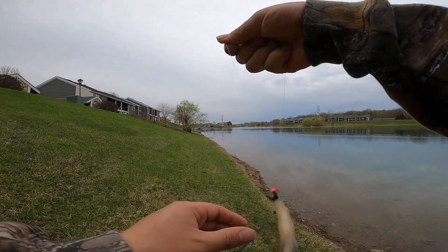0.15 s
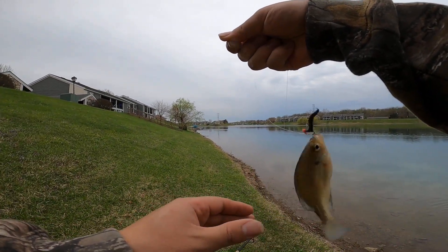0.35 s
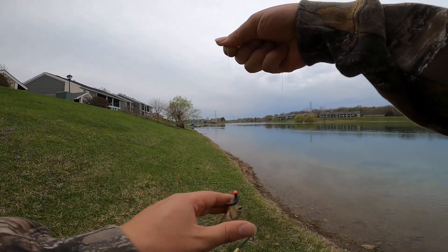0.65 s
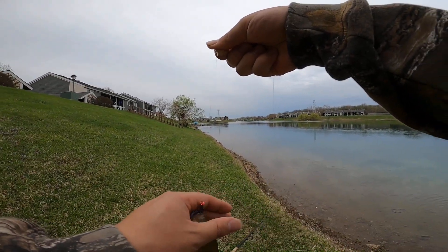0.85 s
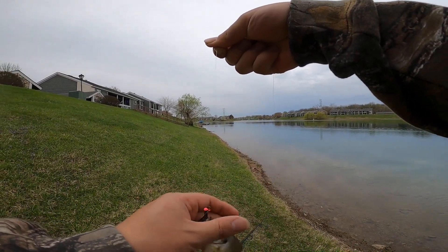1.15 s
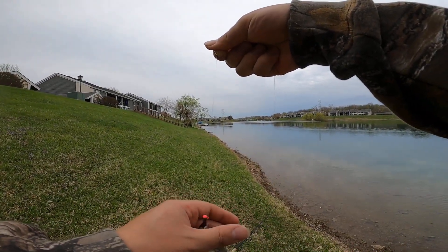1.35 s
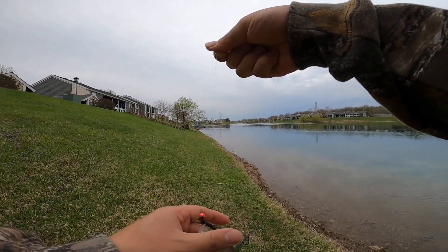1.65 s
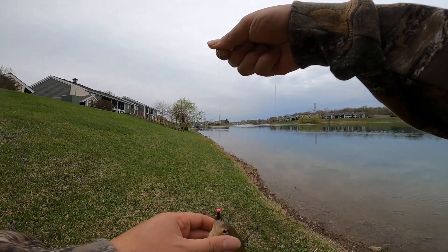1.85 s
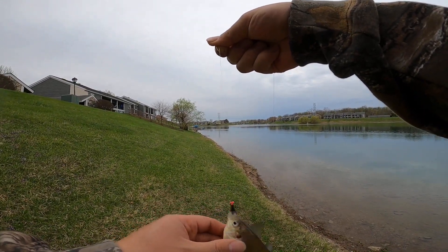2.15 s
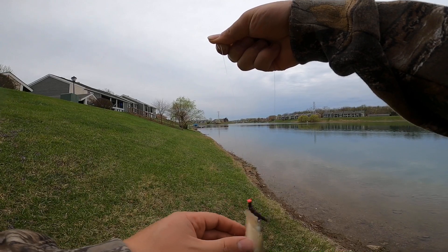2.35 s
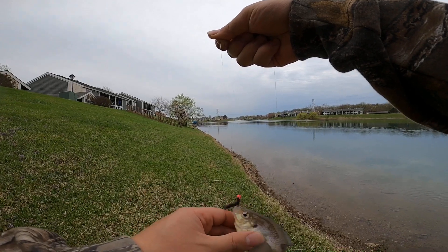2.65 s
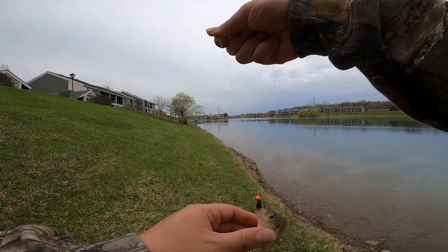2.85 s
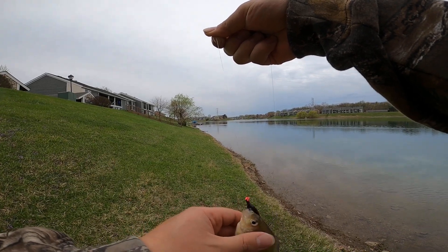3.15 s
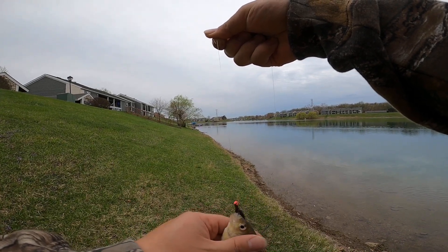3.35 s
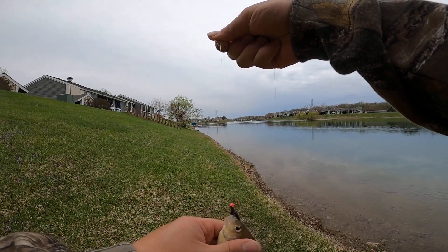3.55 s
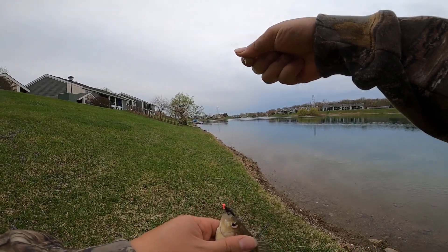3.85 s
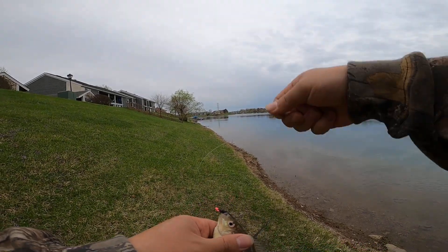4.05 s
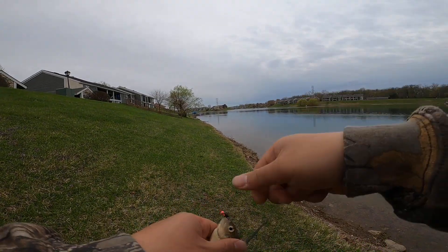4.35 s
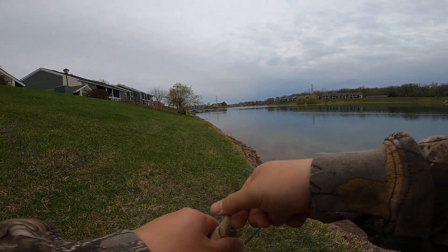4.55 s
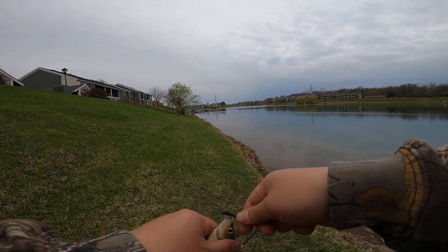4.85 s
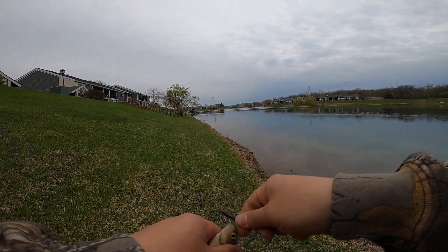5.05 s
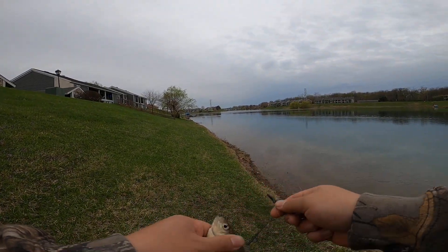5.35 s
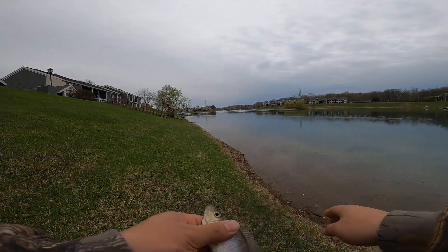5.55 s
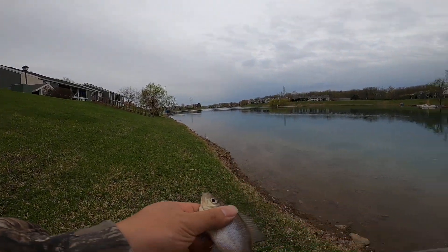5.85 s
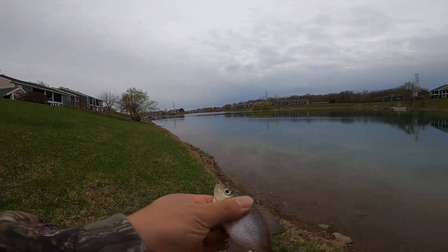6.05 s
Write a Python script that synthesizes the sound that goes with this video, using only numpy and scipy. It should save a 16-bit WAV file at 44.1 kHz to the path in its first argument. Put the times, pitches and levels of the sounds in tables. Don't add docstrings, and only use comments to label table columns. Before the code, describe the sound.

Hoarse sparrow cheeps and clear bird whistles outdoors, with sharp wet fish clicks up close, a faint engine hum, and wind thumps at the end.

```python
import sys
import numpy as np
from scipy import signal
from scipy.fft import rfft, irfft, next_fast_len
from scipy.io import wavfile
from scipy.ndimage import uniform_filter1d

SR = 44100
rng = np.random.default_rng(int(sys.argv[2]) if len(sys.argv) > 2 else 0)


def how_loud(loudness_db):
    steps = np.asarray(loudness_db, float) / 20
    return 10 ** steps


def to_wav(s):
    ch = np.atleast_2d(s).T
    pcm = np.round(np.clip(ch, -1, 1) * 32767)
    wavfile.write(sys.argv[1], SR, pcm.astype(np.int16))


N = 273420
T = np.arange(N) / SR

# time in seconds, pitch in Hz, level in dB.
ENGINE = [(0.0, 112.8, -70), (0.24, 116.6, -47), (0.34, 126.5, -64.5), (0.85, 123.9, -49),
          (2.16, 123.4, -56), (2.38, 123.5, -42), (2.61, 123.5, -52), (4.45, 121.4, -46),
          (5.51, 120.2, -51), (5.82, 115.7, -55), (6.2, 119, -49.5)]
# frequency in Hz, level in dB.
MAINS = [(231, -66.5), (241, -65), (361, -75.5)]
# frequency in Hz, density in dB per Hz.
TOWN_COLOUR = [(15, -45), (25, -7.5), (59, 7.5), (123, -2), (143, -6.5), (182, -13.5), (246, -18.5),
               (291, -21), (651, -31.5), (1020, -29), (2200, -43), (2860, -74.5), (4840, -120)]
# frequency in Hz, density in dB per Hz.
CHORUS_COLOUR = [(1500, -22), (2200, 4), (4000, 0), (5500, -8), (7800, -8.5), (8600, -21), (15000, -32.5)]
# frequency in Hz, density in dB per Hz.
SLEEVE_COLOUR = [(1000, -5.5), (2300, -3), (4000, -3.5), (7000, -17), (10000, -28), (15000, -36)]
# frequency in Hz, correlation from 0 to 1.
LIKENESS = [(25, 0.93), (60, 0.99), (120, 1), (260, 0.86), (530, 0.82), (1100, 0.76), (2200, 0.87),
            (4600, .1), (16000, 0.043)]
# time in seconds, traffic level in dB, far chorus level in dB.
AIR = [(0, -67, -82), (1, -67.5, -84), (1.85, -67.5, -88), (2.7, -68.5, -81), (3.8, -68, -86.5),
       (4.1, -66.5, -78), (4.749, -68, -83.5), (5.1, -67.5, -77.5), (5.62, -67.5, -85.5), (6.2, -62, -71.5)]
# time in seconds, level in dB.
RUSTLE = [
    (5.65, -88),
    (5.85, -67),
    (6.0, -65.5),
    (6.1, -61.5),
    (6.2, -59),
]
# start in seconds, length in seconds, centre in Hz, width in Hz, level in dB.
CHATTER = [
    (-.1, 0.58, 4600, 3440, -69),
    (0.543, 0.32, 4230, 2510, -73),
    (1.472, 0.35, 3960, 3121, -72),
    (2.047, 0.31, 4050, 2430, -73),
    (2.688, 0.28, 5470, 3460, -70),
    (3.059, 0.48, 7300, 700, -89),
    (3.189, 0.42, 4040, 2515, -74),
    (3.894, 0.84, 4221, 3000, -78),
    (4.807, 0.76, 2650, 1490, -67.5),
    (5.129, 0.21, 5450, 2990, -66),
]

# start in seconds, length in seconds, middle pitch in Hz, level in dB.
LEADS = [
    (0, 0.022, 4550, -65),
    (1.505, 0.05, 5900, -72),
    (2.012, 0.06, 5900, -78),
    (2.61, 0.048, 5810, -74.5),
    (2.88, 0.028, 6600, -76),
    (3.23, .06, 6225, -83),
    (3.91, .04, 5850, -82.5),
]
# start in seconds, length in seconds, middle pitch in Hz, level in dB.
ARCHES = [
    (1.622, .02, 4000, -65.5),
    (4.11, 0.023, 3600, -74.5),
]
# start in seconds, length in seconds, middle pitch in Hz, level in dB.
FALLS = [
    (2.655, .05, 4990, -73),
    (3.33, .04, 4550, -77),
]
# start in seconds, length in seconds, middle pitch in Hz, level in dB.
DROOPS = [
    (0.022, .03, 4600, -63),
]
# start in seconds, length in seconds, middle pitch in Hz, level in dB.
RISES = [
    (6.015, 0.015, 3980, -68),
]
# start in seconds, length in seconds, middle pitch in Hz, level in dB.
CLIMBS = [
    (2.735, .075, 6800, -75),
    (.23, 0.018, 7500, -74),
    (3.9, .02, 4100, -81),
    (5.225, .055, 6400, -72),
]
# share of length, pitch over top pitch, level in dB.
CROWN = [(0, .7, -4), (.14, 1.03, -2.5), (.32, 1.01, -6), (.68, .98, -1), (.84, .9, 3.5), (1, .69, -3)]
# start in seconds, length in seconds, top pitch in Hz, level in dB.
CROWNS = [
    (.582, .054, 5100, -68),
    (1.56, 0.054, 4752, -65.5),
    (2.066, 0.056, 4850, -67),
    (2.652, .053, 4740, -64.5),
    (3.272, .058, 4700, -70.5),
    (3.948, 0.055, 4990, -69),
]
# share of length, pitch over top pitch, level in dB.
SWEEP = [(0, .71, -2.5), (.2, .75, 0), (.5, .92, 0.5), (.75, 0.99, -1.5), (.86, .88, -2.5), (1, .76, -6)]
# share of length, pitch over top pitch, level in dB.
UPPER = [(0, .97, -8), (.3, 1.07, -2), (.75, 1.11, -0.5), (1, 1.02, -6)]
# start in seconds, length in seconds, top pitch in Hz, level in dB.
SWEEPS = [
    (.088, 0.061, 4400, -68),
    (.668, .062, 4403, -68.5),
    (1.65, .052, 4350, -64),
    (2.153, .08, 4390, -66.5),
    (2.745, .055, 4490, -67.5),
    (3.37, .054, 4300, -70.5),
    (4.04, .062, 4250, -70),
    (1.76, 0.041, 4230, -76),
]

# start in seconds, peak in dB, high ring in Hz, length in ms.
DRY_TICKS = [(0.0126, -51, 5680, 2.06), (0.0403, -44.5, 7300, 3.5), (0.2585, -46, 6430, 1.66),
             (0.326, -52, 6150, 1.6), (.342, -52, 5140, 0.99), (.3993, -55, 5430, 1.5),
             (0.5112, -54, 6940, 2.2), (0.5205, -54.5, 8800, 1), (0.5916, -55, 8540, 1),
             (0.97, -67, 9800, 2.33), (1.1248, -62, 6700, 1.6), (1.1625, -50, 7306, 1.1),
             (1.2075, -47, 8600, 1), (.061, -64, 8000, 1.4), (.079, -64, 9000, 1.3), (.097, -67, 9500, 1.4),
             (.318, -66, 10000, 1.6), (1.087, -64, 9000, 1), (1.2, -65, 10000, 2), (1.749, -62, 5500, 1.6),
             (1.62, -60, 7000, 1.2), (1.69, -65, 7500, 1.2), (2.145, -49, 6960, 3.8),
             (3.8989, -54.5, 7640, 3.1), (4.674, -64, 8200, 6.6), (4.713, -72, 7500, 1.5),
             (4.7455, -65, 7460, 3.13), (4.7564, -64.5, 7360, 2.2), (4.7654, -68, 8000, 2.6)]
# start in seconds, peak in dB, length in ms.
FLICKS = [(.187, -59, 2.1), (0.2186, -55, 2.3), (0.227, -46.5, 1), (0.5314, -55.5, 2.2), (.83, -59, 7.4),
          (0.8383, -53.5, 6.3), (1.1065, -53.5, 1.2), (1.245, -66, 2.2), (1.0555, -55, 1.5),
          (1.4292, -61, 3.3), (1.4733, -54.5, 2.2), (1.5965, -42.5, 3.1), (3.884, -52, 0.62),
          (6.1601, -63, 2.6)]
# start in seconds, peak in dB, length in ms.
SLAPS = [(.1967, -55, 7.7), (0.425, -58, 2.5), (1.0134, -49.5, 2.99), (1.0174, -49.5, 2.5),
         (1.0528, -53.5, 0.83), (1.063, -55, 2), (1.0669, -55.5, 4.3), (1.177, -65, 1.4),
         (1.2945, -64, 1.4), (1.3, -59, 1.5), (1.3172, -51.5, 4.9), (1.4506, -57, 3.5), (1.5586, -53, 9.4),
         (1.566, -55, 6.8), (1.578, -46, 3.7), (1.603, -50.5, 1.6), (1.7421, -58, 1.18),
         (2.6406, -55.5, 1.7), (2.681, -58.5, 1.5)]
# start in seconds, peak in dB, ring in Hz.
SNAPS = [
    (0.2259, -35, 3410),
    (1.0138, -40.5, 1410),
    (1.107, -52, 5000),
    (1.2048, -49, 2200),
    (1.5967, -32.5, 3470),
    (2.6407, -44.5, 3767),
    (6.1594, -46, 3730),
]
# start in seconds, peak in dB, ring in Hz.
KNOCKS = [
    (.226, -33.5, 154),
    (1.014, -30, 134),
    (1.576, -38.5, 180),
    (2.3, -39, 164),
]

# start in seconds, length in seconds, middle pitch in Hz, level in dB.
LEVELS = [(.125, 0.024, 5820, -56), (.548, .028, 5830, -77), (1.79, .052, 3260, -73),
          (2.299, 0.07, 2710, -75.5), (2.835, 0.053, 2540, -80.5), (2.935, 0.13, 4660, -80.5),
          (3.39, 0.055, 2670, -77.5), (3.728, 0.07, 2490, -76), (3.86, 0.12, 2260, -76.5),
          (3.9, 0.066, 3100, -70.5), (3.98, .06, 2680, -74), (4.405, 0.017, 3350, -74),
          (4.533, 0.023, 3350, -78), (4.835, 0.05, 3200, -75), (5.16, 0.042, 2149, -73),
          (5.43, .034, 2390, -74), (4.2, 0.059, 3810, -78.5), (3.465, 0.074, 3520, -82.5),
          (3.56, .07, 3910, -81), (3.655, 0.029, 3900, -78.5), (2.86, .035, 3080, -77),
          (2.9, 0.04, 2900, -80.5), (1.74, 0.034, 2200, -76), (5.17, .015, 2750, -73),
          (5.68, .03, 2600, -72), (5.725, .013, 2478, -65), (5.66, .014, 4900, -74.5),
          (5.87, .084, 5650, -78)]
# start in seconds, length in seconds, middle pitch in Hz, level in dB.
SLURS = [
    (.91, 0.036, 2770, -79),
    (.915, 0.029, 3900, -78),
    (5.22, .018, 2850, -70.5),
    (5.205, .03, 4400, -62.5),
    (4.798, 0.016, 3200, -76),
    (3.5, .02, 3000, -83),
]
# start in seconds, length in seconds, middle pitch in Hz, level in dB.
PEEPS = [
    (2.255, 0.018, 2040, -75.5),
    (2.715, .07, 3100, -63),
    (2.805, 0.025, 5800, -58.5),
    (3.67, .02, 2903, -72.5),
    (2.905, .022, 7000, -67),
    (1.81, .016, 4000, -78.5),
    (5.161, 0.0301, 5710, -48),
]
# start in seconds, length in seconds, middle pitch in Hz, level in dB.
LIFTS = [
    (5.178, .0061, 4260, -64),
    (5.25, 0.079, 2160, -70.5),
    (5.698, .02, 7700, -81),
    (5.79, .044, 5950, -82),
    (5.95, 0.025, 7700, -72),
    (6.14, .025, 7830, -79),
]
# start in seconds, level in dB, whip level in dB.
HOOKS = [
    (0.236, -61, -7),
    (0.617, -60.5, -4),
    (1.003, -62.5, -2),
    (1.292, -62.5, -6),
    (1.624, -63, -10),
    (1.929, -66, -4),
    (2.282, -61, -2.5),
    (2.588, -58.5, -11.5),
]
# time into the note in seconds, pitch in Hz.
HOOK_SHAPE = [(0, 1601), (.015, 2246), (0.026, 2502), (.036, 2504), (.049, 2350), (.053, 2700),
              (0.056, 4630), (0.063, 7400)]
# share of length, pitch over top pitch, level in dB.
STOOP = [(0, 1.03, -6), (.35, .97, 0.5), (.8, .75, -4.5), (1, .71, -9)]
# start in seconds, length in seconds, top pitch in Hz, level in dB.
STOOPS = [
    (3.24, .042, 2980, -68.5),
    (4.35, .032, 3450, -61),
    (4.67, .02, 3800, -72),
    (4.655, .04, 3510, -63),
    (4.888, .038, 3490, -62),
    (5.095, .03, 3550, -61.5),
    (3.672, 0.027, 4792, -78),
]
# time in seconds, pitch in Hz, level in dB.
WARBLES = [
    [(5.464, 3120, -72), (5.505, 2949, -67), (5.511, 3220, -76), (5.517, 2010, -76), (5.527, 2400, -66.5),
     (5.565, 2530, -60), (5.6, 2610, -59.5), (5.606, 3300, -69), (5.611, 2750, -68)],
    [(5.611, 2750, -67), (5.63, 2549, -64), (5.652, 3050, -67), (5.672, 2278, -61), (5.68, 2000, -72),
     (5.69, 2300, -64), (5.7, 2050, -70), (5.712, 2760, -73), (5.725, 2850, -76)],
    [(5.735, 2050, -72), (5.745, 1960, -71), (5.755, 2400, -62), (5.763, 2050, -70), (5.78, 2300, -74)],
    [(5.828, 3500, -78), (5.836, 4800, -72), (5.87, 4520, -69), (5.876, 3620, -70), (5.893, 3900, -73),
     (5.905, 3320, -78)],
    [(4.435, 2420, -74), (4.48, 2580, -67), (4.525, 2720, -63), (4.545, 2700, -76)],
    [(4.378, 2605, -66.5), (4.4, 2750, -73), (4.405, 2300, -68), (4.412, 1995, -70), (4.45, 1951, -76)],
    [(4.79, 2300, -76), (4.83, 2500, -77), (4.85, 2150, -74), (4.885, 2450, -70), (4.92, 2460, -68),
     (4.96, 2200, -73), (5.0, 2000, -73)],
    [(5.03, 2347, -71), (5.06, 2600, -70.5), (5.09, 2750, -71), (5.105, 2390, -71), (5.14, 2460, -73)],
]
# start in seconds, end in seconds, pips per second, pitch in Hz, glide in Hz, level in dB.
RATTLES = [
    (5.53, 5.73, 53, 3480, 200, -75),
    (5.752, 5.92, 47.5, 3060, -200, -68.5),
]
# time in seconds, peak in dB, width in ms.
GUSTS = [
    (5.928, -24.5, 4.5),
    (5.95, -35.5, 4.3),
    (5.978, -29.5, 4.8),
    (6.015, -23, 3.9),
]


def level(x, db):
    return x * how_loud(db) / np.sqrt(np.mean(x ** 2))


def on_log(hz, points):
    points = np.array(points)
    return np.interp(np.log(hz), np.log(points[:, 0]), points[:, 1])


def walk(rate_hz, size=N):
    hold = max(int(SR / rate_hz), 1)
    steps = np.repeat(rng.standard_normal(size // hold + 1), hold)
    return 1.7 * uniform_filter1d(uniform_filter1d(steps, hold), hold)[:size]


SHAKE = np.array([walk(800), walk(250), walk(45)])


def ports(left_over_right_db):
    return how_loud(np.array([[left_over_right_db / 2], [-left_over_right_db / 2]]))


def add(out, start_s, sound, pan_db, lag=0):
    right_i = int(start_s * SR)
    for track, i, gain in zip(out, (right_i + lag, right_i), ports(pan_db)[:, 0]):
        track[i:i + len(sound)] += sound[:N - i] * gain


def noise(colour, lo_hz, hi_hz, flicker_db, rate_hz):
    size = next_fast_len(N)
    hz = np.maximum(np.arange(size // 2 + 1) * SR / size, 1)
    like = np.clip(on_log(hz, LIKENESS), 0, 1)
    mid, side = rfft(rng.standard_normal((2, size)))
    sides = side * np.sqrt(1 - like) * np.array([[1], [-1]])
    both = how_loud(on_log(hz, colour)) * (mid * np.sqrt(1 + like) + sides)
    out = 0
    for centre in np.arange(np.log2(lo_hz), np.log2(hi_hz), .5):
        band = np.cos(np.pi * np.clip(np.log2(hz) - centre, -.5, .5))
        out = out + irfft(both * band ** 2, size)[:, :N] * how_loud(flicker_db * walk(rate_hz))
    return out


def engine_and_mains():
    s, hz, db = np.transpose(ENGINE)
    phase = 2 * np.pi * np.cumsum(np.interp(T, s, hz)) / SR
    out = how_loud(np.interp(T, s, db) + 0.75 * walk(12)) * np.sin(phase)
    for hz, db in MAINS:
        strength = how_loud(db + 1.8 * walk(5))
        out = out + strength * np.sin(2 * np.pi * np.cumsum(hz + 0.719 * walk(4)) / SR)
    return np.sqrt(2) * out * ports(.8)


def rumble():
    return level(noise(TOWN_COLOUR, 20, 170, 0.89, 6.6), -47)


def traffic():
    s, traffic_db, _ = np.transpose(AIR)
    steady = level(noise(TOWN_COLOUR, 163.7, 1900, 1.6, 8), 9.3)
    return steady * how_loud(np.interp(T, s, traffic_db)) * ports(.9)


def far_chorus():
    s, _, chorus_db = np.transpose(AIR)
    return level(noise(CHORUS_COLOUR, 1810, 16000, 1.3, 20), 6.3) * how_loud(np.interp(T, s, chorus_db))


def chatter():
    out = np.zeros((2, N))
    for s, length_s, hz, width_hz, db in CHATTER:
        u = np.linspace(max(-s, 0) / length_s, 1, int((length_s + min(s, 0)) * SR))
        n = len(u)
        sos = signal.butter(4, [hz - width_hz / 2, hz + width_hz / 2], "band", fs=SR, output="sos")
        twitter = signal.sosfilt(sos, rng.standard_normal((2, n)))
        blur = level(twitter * how_loud(2 * walk(40, n)), -2.7)
        voices = 0
        for pan_db in (-4, 0, 4):
            path_hz = hz + width_hz * .3 * np.tanh(walk(45, n))
            phase = 2 * np.pi * np.cumsum(path_hz) / SR + .8 * walk(800, n)
            gate = np.clip(walk(130, n) - .3, 0, 1.5)
            voices = voices + np.sin(phase) * gate * ports(pan_db)
        swell = np.sin(np.pi * u ** .7)
        i = int(max(s, 0) * SR)
        out[:, i:i + n] += (blur + level(voices, -10)) * how_loud(db) * swell
    return out


def syrinx(k, hz, rough, edge):
    rasp, flutter, _ = np.roll(SHAKE, -int(3001 * k), axis=1)[:, :len(hz)]
    phase = 2 * np.pi * np.cumsum(hz) / SR + 1.3 * rough * rasp
    u = np.linspace(0, 1, len(hz))
    swell = np.sin(np.pi / 2 * np.clip(np.minimum(u, 1 - u) / edge, 0, 1)) ** 2
    octave = how_loud(-38) * np.sin(2 * phase)
    return np.sqrt(2) * swell * how_loud(4.6 * rough * flutter) * (np.sin(phase) + octave)


def notes(kinds, rough, edge, pan_db, lag):
    out = np.zeros((2, N))
    for start, end, table in kinds:
        for s, length_s, mid_hz, db in table:
            u = np.linspace(-1, 1, int(length_s * SR))
            slope = (end - start) / 2 * u
            arch = ((start + end) / 2 - 1) * np.abs(u) ** 3.2
            tone = syrinx(int(10 * s), mid_hz * (1 + slope + arch), rough, edge)
            add(out, s, how_loud(db) * tone, pan_db, lag)
    return out


def shaped(shape, table, rough, pan_db, lag, extra_db=0):
    out = np.zeros((2, N))
    share, pitch, shape_db = np.transpose(shape)
    for s, length_s, top_hz, db in table:
        u = np.linspace(0, 1, int(length_s * SR))
        hz = uniform_filter1d(top_hz * np.interp(u, share, pitch), size=120, mode="nearest")
        tone = syrinx(int(10 * s + top_hz % 7), hz, rough, .08)
        add(out, s, how_loud(db + extra_db + np.interp(u, share, shape_db)) * tone, pan_db, lag)
    return out


def house_echo(dry, delay_s, db):
    return dry + how_loud(db) * np.roll(dry[::-1], int(delay_s * SR), axis=1)


def trees(dry, t60_s, wet_db):
    t = np.arange(int(.6 * SR)) / SR
    tail = rng.standard_normal((2, len(t))) * how_loud(-60 * t / t60_s) * np.clip(t / 0.0027, 0, 1)
    tail /= np.sqrt(np.sum(tail ** 2, axis=1, keepdims=True))
    return dry + how_loud(wet_db) * signal.fftconvolve(dry, tail, axes=1)[:, :N]


def sparrow():
    kinds = ((0.93, 1.05, LEADS), (.78, .78, ARCHES), (1.07, 0.9, FALLS),
             (1.0, 0.72, DROOPS), (0.62, 1.2, RISES), (.82, 1.06, CLIMBS))
    calls = notes(kinds, .3, .2, 9, lag=1)
    calls = calls + shaped(CROWN, CROWNS, .33, 9, lag=1)
    calls = calls + shaped(SWEEP, SWEEPS, .3, 9, lag=1)
    calls = calls + shaped(UPPER, SWEEPS, .45, 9, lag=1, extra_db=-7.5)
    calls = house_echo(house_echo(calls, .006, -7), .021, -6)
    return trees(calls, .28, -7)


def ring(x, hz, width_hz):
    y = signal.lfilter(*signal.iirpeak(hz, hz / width_hz, fs=SR), x)
    return y / np.max(np.abs(y))


def fish():
    out = np.zeros((2, N))
    t = np.arange(int(0.037 * SR)) / SR
    ticks = [(s, db, -22, hz, ms) for s, db, hz, ms in DRY_TICKS]
    ticks += [(s, db, 0, 5820, ms) for s, db, ms in FLICKS]
    ticks += [(s, db, 6, 6630, ms) for s, db, ms in SLAPS]
    crackle = rng.standard_normal((len(ticks), len(t)))
    dull = signal.butter(3, 10500, fs=SR, output="sos")
    since_s = t - .012
    spatter_env = np.exp(np.minimum(-since_s / 0.0072, since_s / .004))
    for (s, db, low_db, hz, ms), c in zip(ticks, crackle):
        rise = np.maximum(since_s, 0) * 2000 / max(ms, .2)
        spatter = how_loud(-29) * np.abs(np.roll(c, 99)) ** 2 * spatter_env
        burst = c * (rise * np.exp(-rise ** 2) + spatter)
        high = ring(ring(burst, hz, 3000), hz, 3000) + how_loud(-19.0) * ring(burst, 9800, 6000)
        low = ring(ring(burst, 3060, 2500), 1700, 3000)
        tick = how_loud(db) * signal.sosfilt(dull, high + how_loud(low_db) * low)
        add(out, max(s - .0125, 0), tick, -4.5 + 3.4 * c[0], lag=1)
    for s, db, hz in SNAPS:
        add(out, s, how_loud(db) * np.sin(2 * np.pi * hz * t) * np.exp(-t / 0.00099), -3.5, lag=1)
    for s, db, hz in KNOCKS:
        add(out, s, how_loud(db) * np.sin(2 * np.pi * hz * t) * np.exp(-t / 0.0047), 0.5)
    return out


def whistles():
    kinds = ((0.99, 0.98, LEVELS), (1.16, .77, SLURS), (0.93, .89, PEEPS), (.94, 1.03, LIFTS))
    return notes(kinds, .19, 0.17, 1.5, lag=2)


def hooks():
    out = np.zeros((2, N))
    s, hz = np.transpose(HOOK_SHAPE)
    t = np.arange(int(s[-1] * SR)) / SR
    path_hz = np.interp(t, s, hz)
    for start_s, db, whip_db in HOOKS:
        shape_db = np.interp(t, s[[0, 2, 3, 4, 5, 7]], [-16, 0, 0, -6, whip_db, whip_db - 9.5])
        add(out, start_s, how_loud(db + shape_db) * syrinx(start_s, path_hz, 0.15, 0.028), 6, lag=4)
    return out


def stoops():
    return shaped(STOOP, STOOPS, 0.22, 1.4, lag=2)


def warble():
    out = np.zeros((2, N))
    near_phrases = 5
    for k, phrase in enumerate(WARBLES):
        s, hz, db = np.transpose(phrase)
        t = np.arange(s[0], s[-1], 1 / SR)
        path_hz = uniform_filter1d(np.interp(t, s, hz), size=130, mode="nearest")
        rough = .25 if k < near_phrases else .6
        add(out, s[0], how_loud(np.interp(t, s, db)) * syrinx(3 * k + 1, path_hz, rough, .04), -.4, lag=2)
    return out


def buzz():
    out = np.zeros((2, N))
    start_s, end_s, beat_hz = 5.235, 5.668, 322
    t = np.arange(0, end_s - start_s, 1 / SR)
    u = t / t[-1]
    hz = 4000 + 198 * np.exp(-t / 0.029) + 600 * t + 10 * SHAKE[2, :len(t)]
    fade_db = -63 - 7.5 * u
    lines = ((0, 0), (-1, np.interp(u, (0, 1), (-3.5, 3))), (1, -5))  # (beat multiple, dB)
    tone = sum(how_loud(fade_db + db) * syrinx(k, hz + k * beat_hz, .27, .06) for k, db in lines)
    add(out, start_s, tone, -1.5, lag=2)
    return out


def rattles():
    out = np.zeros((2, N))
    for start_s, end_s, rate_hz, hz, glide_hz, db in RATTLES:
        path_hz = hz + glide_hz * np.linspace(-1, 1, 560)
        for k, s in enumerate(np.arange(start_s, end_s, 1 / rate_hz)):
            pip_db = db + 2.5 + 1.5 * SHAKE[1, 900 * k]
            add(out, s, how_loud(pip_db) * syrinx(k, path_hz, .3, .45), -1.5, lag=2)
    return out


def sleeve():
    crackly = noise(SLEEVE_COLOUR, 1100, 16000, 3.1, 27) * how_loud(1.3 * walk(400))
    return level(crackly, 0) * how_loud(np.interp(T, *np.transpose(RUSTLE), left=-200))


def wind():
    bumps = 0
    for s, db, ms in GUSTS:
        u = (T - s) * 1000 / ms
        bumps = bumps + how_loud(db) * (1 - u ** 2 / 1.37) * np.exp(-u ** 2 / 3)
    return bumps * how_loud(np.array([[-18], [0]]))


def scene():
    backdrop = engine_and_mains() + rumble() + traffic() + far_chorus() + sleeve()
    backdrop[0, 4:] = backdrop[0, :-4].copy()
    clear = whistles() + hooks() + stoops() + warble() + buzz() + rattles()
    return backdrop + chatter() + sparrow() + fish() + trees(clear, .3, -13) + wind()


def band_limit(x):
    return signal.sosfilt(signal.butter(12, 15600, fs=SR, output="sos"), x)


def record(dry):
    lost = (T > 2.2143) & (T < 2.2356)
    gate = uniform_filter1d(np.where(lost, how_loud(-32), 1), size=90)
    clicks = how_loud(-53.5) * np.diff(1. * lost, prepend=0)
    hiss = how_loud(-104) * rng.standard_normal(dry.shape)
    return band_limit(dry * gate + clicks + hiss)


dry = scene()
out = record(dry)
to_wav(out)
```